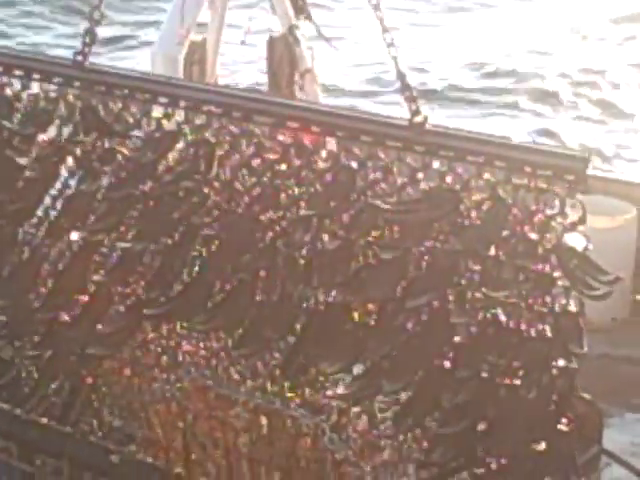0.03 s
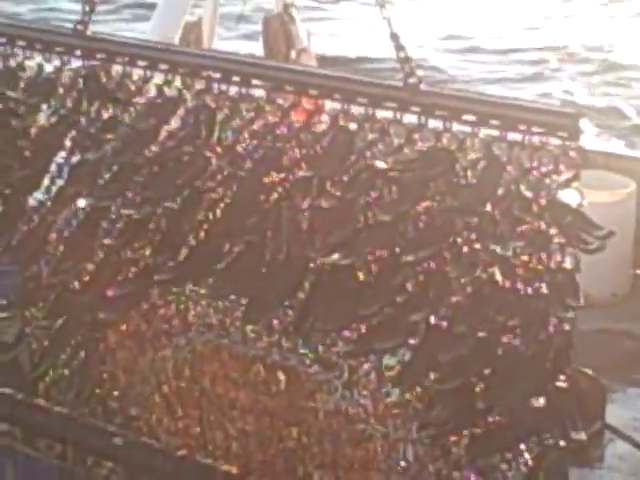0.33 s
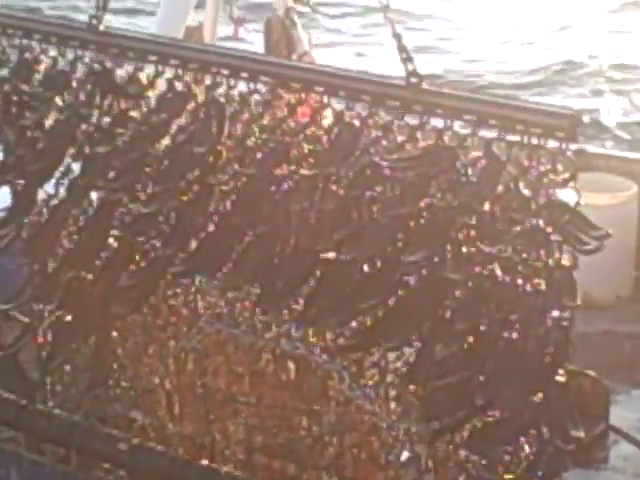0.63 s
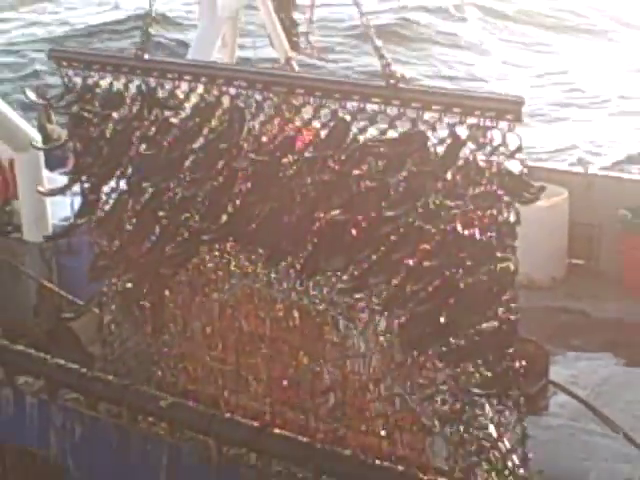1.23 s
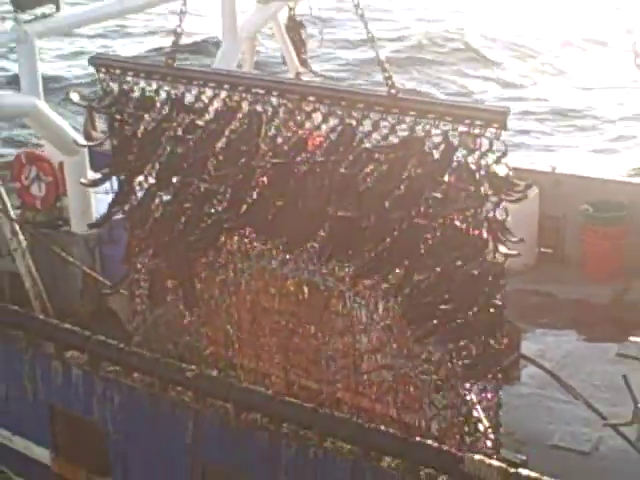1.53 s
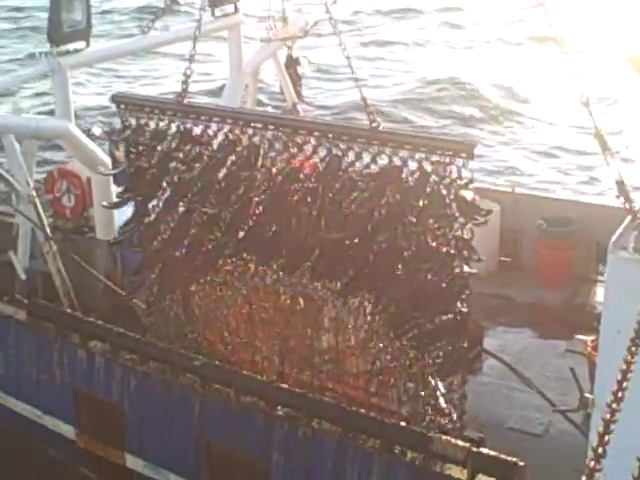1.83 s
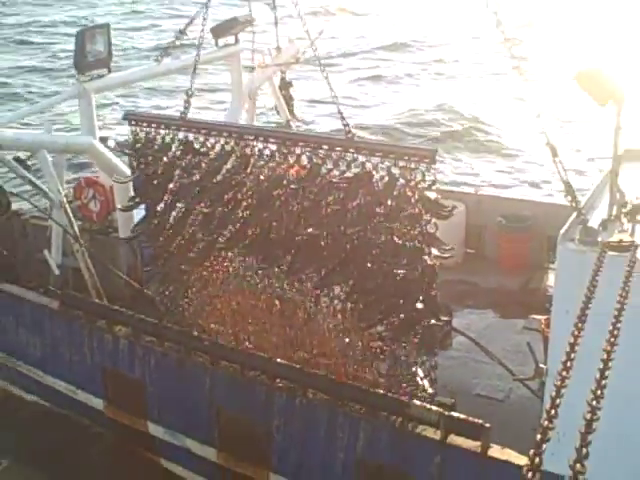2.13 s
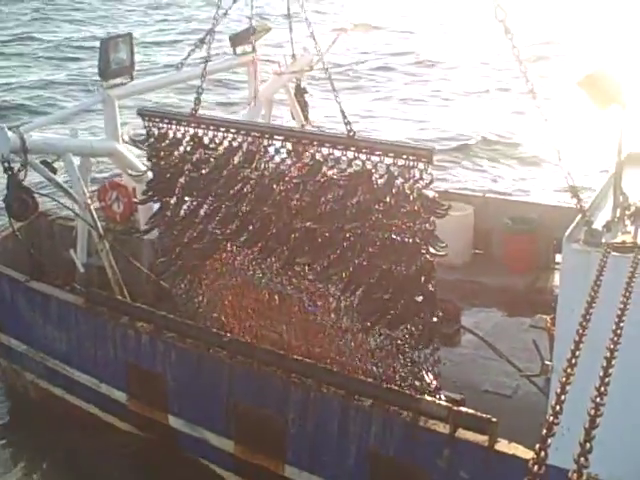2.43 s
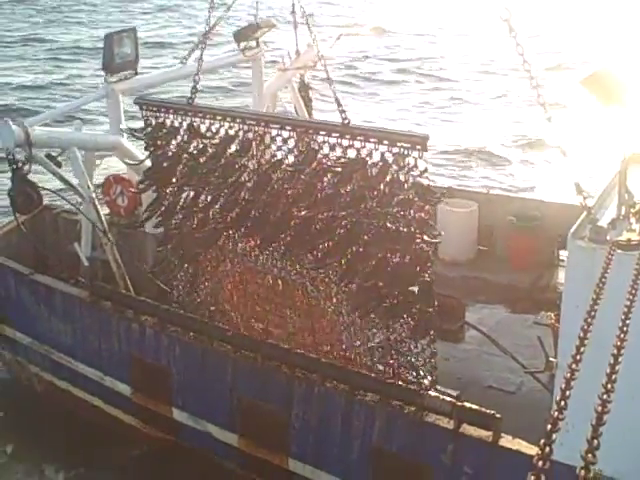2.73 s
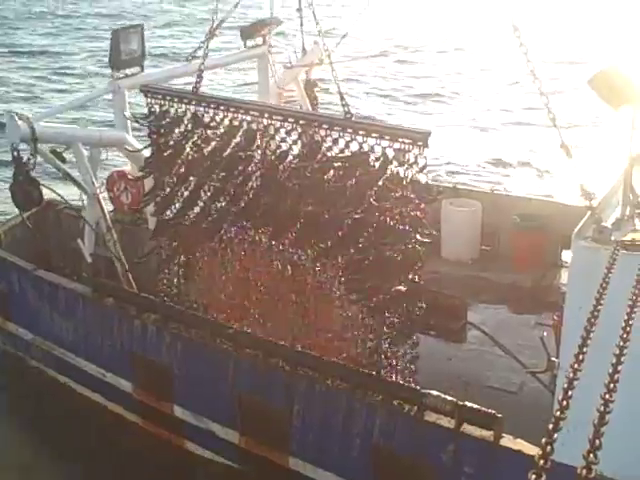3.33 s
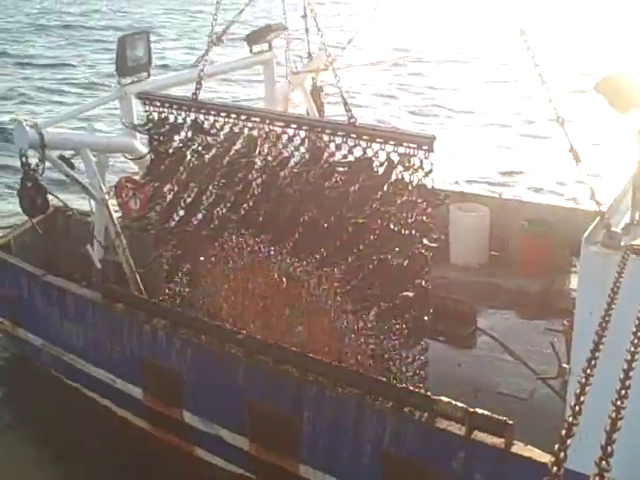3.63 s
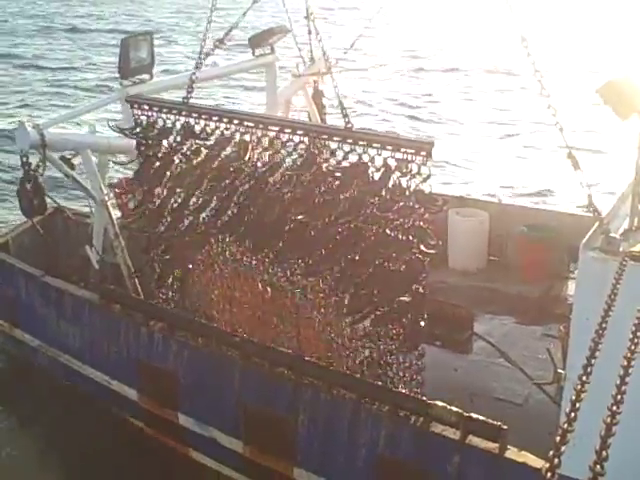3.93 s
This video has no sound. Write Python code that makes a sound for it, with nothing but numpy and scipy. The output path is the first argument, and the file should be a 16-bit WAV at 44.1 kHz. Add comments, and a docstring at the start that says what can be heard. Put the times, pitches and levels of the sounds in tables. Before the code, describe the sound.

A fishing boat's diesel engine throbs and ticks as wind rumbles on the microphone on deck. A winch whines and fades, water gushes, then a steel dredge scrapes, squeaks and clinks as the winch returns amid hard gusts.

```python
"""On the deck of a fishing boat at sea, microphone in the wind, close to a steel-ring dredge over the side.
From the start a four-cylinder diesel throbs and ticks, wind rumbles, and a winch whines, then fades.
After a second the steel groans and water gushes off the dredge; from 1.75 s it scrapes and squeals,
and soon its rings clink. Near 2.3 s the winch returns and the hardest buffets overload the microphone.
The scraping ends around 3.5 s, leaving engine, sea and one more gust."""
import sys
import numpy as np
from scipy import signal
from scipy.fft import rfft, irfft
from scipy.io import wavfile
from scipy.ndimage import uniform_filter1d

SR = 44100
rng = np.random.default_rng(int(sys.argv[2]) if len(sys.argv) > 2 else 0)


def transcribe(signal):
    """Save signal, clipped to [-1, 1], as a 16-bit WAV file at the path in sys.argv[1]."""
    frames = np.atleast_2d(signal).T
    limited = np.clip(frames, -1, 1)
    pcm = np.round(limited * 32767).astype(np.int16)
    wavfile.write(sys.argv[1], SR, pcm)


N = 176400
T = np.arange(N) / SR

CYCLE_HZ = 15.12
# exhaust tones: multiple of the engine cycle, relative level/dB
EXHAUST_TONES = [(1, -34), (2, -43), (4, -39), (6, -39), (8, -35), (12, -38.5), (16, -42)]
def exhaust(waver=0.14, gain_db=-3.5):
    """The diesel's exhaust throbs in wavering harmonics of the engine cycle."""
    out = np.zeros(N)
    for multiple, db in EXHAUST_TONES:
        swell = 1 + waver * drift(hz=7.3)
        phase = 2 * np.pi * (multiple * CYCLE_HZ * T + rng.random())
        out += amp(db) * swell * np.sin(phase + waver * drift(hz=1))
    return amp(gain_db) * out


# cylinders in firing order: relative level/dB
CYLINDER_KNOCKS = [-10.5, -5, -3, -15.5]
# knock spectrum: f/Hz, relative level/dB
KNOCK_SPECTRUM = [(300, 13), (1000, -4), (1300, 13.5), (1800, -4), (2300, -27.5), (3100, 4), (3650, -24),
                  (4300, 3), (4900, 1), (5500, -10), (9000, -28), (16000, -38)]
# engine casing modes: f/Hz, width/Hz, relative level/dB
CASING_RESONANCES = [(2033, 68, 1.5), (3400, 310, -7)]
# knock level, ducking briefly after strong gusts: t/s, relative level/dB
KNOCK_GAIN = [(0, -2.5), (.5, 3), (.73, 0), (.9, 4.5), (1.6, 5.5), (2.2, 3), (2.6, -4.5), (3.2, 1),
              (3.36, -1), (3.55, 0.5), (4, -6)]
def diesel_knock(first_s=0.01225, rise_s=0.0016, fall_s=0.0024):
    """Every firing gives a metallic knock and rings the engine casing."""
    firings = np.zeros(N)
    for k, db in enumerate(CYLINDER_KNOCKS):
        age = (T - first_s - k / len(CYLINDER_KNOCKS) / CYCLE_HZ) % (1 / CYCLE_HZ)
        firings += amp(db) * (1 - np.exp(-age / rise_s)) ** 2 * np.exp(-age / fall_s)
    knock = amp(-52) * colour(firings * noise(), KNOCK_SPECTRUM)
    casing = amp(-58) * unit(resonate(firings * noise(), CASING_RESONANCES))
    return level(KNOCK_GAIN) * (knock + casing)


# winch pitch, sagging under load: t/s, f/Hz
WINCH_PITCH = [(0, 498), (2.35, 498), (2.48, 472), (2.68, 474), (2.78, 494), (4, 485)]
# winch whine at the microphone: t/s, level/dB
WINCH_LEVEL = [(0, -36), (.3, -35.5), (.44, -38.5), (.55, -31.5), (.62, -47), (.75, -47), (1.5, -82),
               (2, -73), (2.3, -34.5), (2.5, -40.5), (2.7, -35.5), (3.1, -50), (4, -43.5)]
def winch(wander_hz=1.5, waver_rad=0.25, flutter=0.3):
    """The winch's hydraulics whine on one unsteady tone."""
    hz = np.interp(T, *np.transpose(WINCH_PITCH)) + wander_hz * drift(hz=3)
    tone = np.sin(2 * np.pi * np.cumsum(hz) / SR + waver_rad * drift(hz=27))
    return level(WINCH_LEVEL) * unit(tone * (1 + flutter * drift(hz=27)))


# dredge dragging on the steel rail: t/s, length/s, level/dB, ringing share (0-1)
RAIL_SCRAPES = [(1.75, 0.069, -47.5, 0.6), (1.861, 0.037, -38, 0.55), (1.906, 0.042, -37, 0.5),
                (2.006, 0.3, -61, 0.9), (2.79, 0.061, -45.5, 0.54), (2.934, 0.054, -41, 0.73),
                (3.012, 0.061, -37.5, 0.37), (3.12, 0.17, -55, 1), (3.445, 0.043, -46.5, 0.1)]
# dredge frame modes: f/Hz, width/Hz, relative level/dB
FRAME_RESONANCES = [(1370, 45, 0), (2085, 45, 0), (2145, 40, -4), (2398, 35, -3), (2640, 60, -5),
                    (2830, 70, -6), (3295, 45, -2), (4420, 60, -15), (5620, 40, -14), (8430, 70, -22),
                    (9350, 70, -23)]
# grating spectrum: f/Hz, relative level/dB
GRIT_SPECTRUM = [(500, -2.5), (900, 1), (1400, 2), (1750, -4), (2200, 5.5), (2900, 5.5), (3450, 2),
                 (3750, -3), (4500, 1.5), (6500, -28), (9000, -39), (16000, -30)]
def dredge_scrapes():
    """Small contacts grate and set the steel frame squealing; each mode grabs and lets go."""
    contacts = grains(per_s=2300, spread_db=1)
    ringing, grating = np.zeros(N), np.zeros(N)
    for start, length, db, share in RAIL_SCRAPES:
        force = amp(db) * envelope(start, length, rise_s=0.0013, fall_s=0.039)
        ringing += force * np.sqrt(share)
        grating += force * np.sqrt(1 - share)
    squeal = resonate(contacts * ringing, FRAME_RESONANCES)
    squeal = np.std(squeal) * patches(squeal, db=3, hz=390, seconds=0.056)
    return squeal + grating * colour(contacts, GRIT_SPECTRUM)


# groans and squeaks: t/s, length/s, f/Hz, level/dB
STICK_SLIPS = [(1.084, 0.06, 342, -38.5), (1.294, .14, 272, -34), (1.859, 0.004, 2480, -32),
               (1.868, .035, 3440, -43.5), (1.923, 0.036, 3300, -40), (2.764, .015, 2080, -47),
               (2.793, 0.03, 3310, -48), (2.802, 0.026, 2093, -44.5), (2.806, 0.043, 5650, -56.5),
               (2.83, 0.036, 8420, -61), (2.848, 0.024, 2130, -44), (2.902, 0.037, 2070, -42),
               (2.92, 0.038, 5610, -54), (2.942, 0.025, 1385, -40), (2.949, 0.03, 3300, -48),
               (3.258, .018, 4250, -51)]
def frame_squeaks(jitter_hz=21.2, roughness=0.31):
    """Where steel sticks and slips, one mode of the frame sings briefly."""
    waver = np.cumsum(jitter_hz * drift(hz=120.6)) / SR
    grip = unit(1 + roughness * drift(hz=90))
    out = np.zeros(N)
    for start, length, hz, db in STICK_SLIPS:
        slip = amp(db) * envelope(start, length, rise_s=0.0032, fall_s=0.0058)
        out += slip * np.sin(2 * np.pi * (hz * T + waver))
    return np.sqrt(2) * grip * out


# rings striking: t/s, level/dB, pitch ratio
RING_STRIKES = [(2.085, -48, 1.05), (2.11, -62, 1.3), (2.14, -67, 1.2), (2.235, -52, 1.06),
                (2.445, -41, 0.993), (3.185, -51, 1.03), (3.965, -53, 1.08)]
# modes of one ring: f/Hz, relative level/dB, t60/s
RING_RESONANCES = [(11690, -13, .45), (12080, -9, .35), (12145, -6, .45), (12400, -9, .1), (12725, 0, .22),
                   (13450, -11, .15), (13740, -12, .25)]
def ring_clinks(rise_s=0.007, chatter_s=0.042, chatter_db=-5.5):
    """Small steel rings chatter against each other and ring on."""
    out = np.zeros(N)
    rattles = [drift(hz=290) for _ in RING_RESONANCES]
    for start, db, ratio in RING_STRIKES:
        span = np.arange(round(start * SR), min(round((start + 0.5) * SR), N))
        age = np.arange(len(span)) / SR
        attack = np.minimum(age / rise_s, 1)
        for (hz, mode_db, t60), rattle in zip(RING_RESONANCES, rattles):
            chatter = amp(chatter_db) * rattle[span] * np.exp(-age / chatter_s)
            swing = amp(-60 * age / t60) + chatter
            out[span] += attack * amp(db + mode_db) * swing * np.sin(2 * np.pi * hz * ratio * age)
    return out


# short dry ticks: t/s, level/dB
DRY_TICKS = [(.05, -57), (0.073, -35.5), (1.817, -37), (1.882, -32), (2.349, -31), (2.372, -34),
             (2.393, -40), (2.452, -66), (3.265, -32.5), (3.277, -42), (3.29, -35), (3.452, -39.5),
             (3.481, -50)]
# tick spectrum: f/Hz, relative level/dB
TICK_SPECTRUM = [(500, 6), (2000, 4), (5000, 0), (8000, -7.5), (16000, -19)]
def ticks():
    """Short bursts of noise; those at 2.35-2.39 s are the crackle of wind overloading the microphone."""
    bursts = sum(amp(db) * envelope(start, 0, rise_s=0.00022, fall_s=0.0057) for start, db in DRY_TICKS)
    return bursts * colour(noise(), TICK_SPECTRUM)


# spray spectrum: f/Hz, relative level/dB
SPRAY_SPECTRUM = [(1000, -31), (2500, 13), (3350, 7.5), (3700, -2), (4500, 9), (5600, 4.5), (6700, -1),
                  (7600, 0), (8600, -0.5), (10200, -7), (11800, -4), (12800, -7), (14200, -6), (15400, -4),
                  (16200, -26)]
# spray at the microphone: t/s, relative level/dB
SPRAY_SWELL = [(0, -67), (.08, -57.5), (.2, -63), (.5, -60.5), (.73, -71), (.87, -67.5), (1.1, -64),
               (1.5, -59.5), (1.85, -54.5), (2.1, -57.5), (2.3, -61), (2.8, -63), (2.97, -56), (3.15, -64),
               (3.5, -67), (4, -74)]
def spray(gain_db=8):
    """Drips and sea spray blend into a fine hiss."""
    hiss = patches(noise(), db=3.2, hz=140, seconds=0.03)
    return amp(gain_db) * level(SPRAY_SWELL) * colour(hiss, SPRAY_SPECTRUM)


# gush spectrum: f/Hz, relative level/dB
GUSH_SPECTRUM = [(1000, 5), (3000, 4), (3650, -7), (4500, 9), (5600, 2.5), (6700, -9), (7500, 3), (8600, 0),
                 (10200, -8.5), (11800, 0), (12800, -7), (14200, 3), (15400, 0), (16200, -23)]
def gush(db=-39.5):
    """Water pours off the dredge once, in thousands of sparkling drops."""
    drops = patches(grains(per_s=5700, spread_db=0.5), db=4.5, hz=109, seconds=0.11)
    flow = amp(db) * envelope(start_s=1.2, hold_s=0.21, rise_s=0.18, fall_s=0.14)
    return flow * colour(drops, GUSH_SPECTRUM)


# turbulence right at the microphone: t/s, length/s, flutter level/dB, rasp level/dB
PORT_BUFFETS = [(0.299, 0.019, -54, -23.5), (0.605, 0.025, -29, -37.5), (2.275, 0.047, -22.5, -37.5),
                (2.347, 0.0085, -12, -17.5), (2.363, 0.0376, -15.5, -23.5), (3.811, 0.031, -23.5, -42),
                (3.843, 0.0097, -23, -30)]
# low flutter spectrum: f/Hz, relative level/dB
FLUTTER_SPECTRUM = [(30, -14), (120, 12), (250, -10.5), (480, -3), (700, -30), (1500, -42), (5000, -53)]
# rasp spectrum: f/Hz, relative level/dB
RASP_SPECTRUM = [(200, -18), (420, 3.5), (600, 12), (820, -15), (1150, 6), (1400, -1), (1750, -18),
                 (2100, -10), (2850, -9), (3250, -23), (4300, -22.5), (6000, -35), (16000, -46)]
# cracks and thumps as buffeting breaks loose: t/s, amplitude, f/Hz, decay/s
PORT_CRACKS = [(0.303, 0.16, 1160, 0.0054), (0.3131, 0.096, 1310, 0.0029), (0.614, 0.23, 107, 0.0064),
               (2.3472, 0.82, 935, 0.00052), (2.371, 0.72, 135, 0.0046), (2.388, 0.29, 216, 0.002),
               (2.4, 0.28, 180, .003), (3.8272, 0.29, 230, 0.0012), (3.845, 0.12, 204, 0.011),
               (3.852, 0.056, 1460, .004)]
# single pops of air: t/s, suction amplitude, hold and decay/s
AIR_POPS = [(2.275, 0.44, 0.0056), (2.7463, 2.1, 0.0017), (2.755, 0.4, 0.0038)]
def buffets():
    """The strongest gusts flutter, rasp, crack and pop at the microphone port."""
    flutter = colour(noise(), FLUTTER_SPECTRUM)
    rasp = colour(grains(per_s=5000, spread_db=1), RASP_SPECTRUM)
    out = np.zeros(N)
    for start, length, flutter_db, rasp_db in PORT_BUFFETS:
        burst = envelope(start, length, rise_s=0.002, fall_s=0.005)
        out += burst * (amp(flutter_db) * flutter + amp(rasp_db) * rasp)
    for start, size, hz, decay in PORT_CRACKS:
        out += size * envelope(start, 0, 1 / SR, decay) * np.sin(2 * np.pi * hz * (T - start))
    for start, suction, decay in AIR_POPS:
        out -= suction * envelope(start, decay, rise_s=0.00083, fall_s=decay)
    return out


# rumble spectrum: f/Hz, relative level/dB
RUMBLE_SPECTRUM = [(2, 11.5), (6, 9), (14, 7), (28, -2.5), (55, -6), (100, -11), (180, -21.5), (400, -31.5),
                   (1500, -75.5)]
# rumble on the microphone: t/s, level/dB
RUMBLE_LEVEL = [(0, -33), (.15, -21), (.27, -20), (.4, -17), (.55, -20), (.64, -14), (.73, -17.5),
                (.87, -18), (.96, -16), (1.1, -14), (1.5, -20), (1.95, -20), (2.2, -16.5), (2.3, -20.5),
                (2.42, -16), (2.5, -25.5), (2.8, -22.5), (3, -19.5), (3.22, -16.5), (3.4, -22.5),
                (3.57, -22), (3.8, -15.5), (4, -22.5)]
# gusts: centre t/s, half width/s, suction amplitude (negative pushes)
PASSING_GUSTS = [(0.295, 0.024, 0.52), (0.668, 0.035, 0.5), (.928, 0.036, -0.62), (2.378, 0.058, 0.9),
                 (3.273, 0.059, 1.15), (3.798, 0.079, 0.6)]
def wind(lumpy_db=0.5, recovery_s=0.42):
    """Wind rumbles, and the pressure swings slowly as gusts pass the microphone."""
    suction = sum(depth * np.exp(-((T - centre) / width) ** 2) for centre, width, depth in PASSING_GUSTS)
    recovery = uniform_filter1d(suction, int(recovery_s * SR))
    turbulence = noise() * amp(-lumpy_db * drift(hz=3.1))
    return level(RUMBLE_LEVEL) * colour(turbulence, RUMBLE_SPECTRUM) - suction + recovery


# machinery and sea spectrum: f/Hz, relative level/dB
ROAR_SPECTRUM = [(30, 6), (110, 9.5), (200, 4.5), (340, -2), (400, 0.5), (470, 4), (560, -3.5),
                 (720, -11.5), (950, -14), (1250, -8.5), (1550, -17), (1850, -19), (2100, -23.5),
                 (2450, -23.5), (3350, -26.5), (3650, -30), (4500, -27), (6500, -43.5), (16000, -86)]
# roar level, ducking briefly after strong gusts: t/s, level/dB
ROAR_GAIN = [(0, -29.5), (.3, -27.5), (.64, -31), (.7, -38), (.75, -41.5), (.79, -31), (.9, -33.5),
             (1.4, -32), (1.75, -31), (1.95, -28.5), (2.25, -32.5), (2.55, -33), (2.9, -33), (3.28, -32.5),
             (3.34, -44.5), (3.48, -36), (3.7, -34), (4, -34.5)]
def roar(patchy_db=1.56):
    """Farther off, machinery and sea merge into an uneven roar."""
    wash = noise() * amp(patchy_db * drift(hz=59))
    wash = patches(wash, db=2, hz=78, seconds=0.41)
    return level(ROAR_GAIN) * colour(wash, ROAR_SPECTRUM)


# dips in the microphone's response: f/Hz, width/Hz, level/dB
MIC_NOTCHES = [(1767, 92, -4), (3700, 130, -7), (5260, 116, -10.5), (6610, 130, -5.5)]
def microphone(x):
    """The microphone dulls a few narrow bands."""
    f = np.fft.rfftfreq(N, 1 / SR)
    response_db = sum(db * np.exp(-((f - hz) / width) ** 2) for hz, width, db in MIC_NOTCHES)
    return irfft(rfft(x) * amp(response_db), N)


def amp(db):
    """Decibels to gain."""
    return 10 ** (np.asarray(db) / 20)


def unit(x):
    """Scales to rms 1."""
    return x / np.sqrt(np.mean(x ** 2) + 1e-20)


def level(points):
    """Gain over time from (t/s, level/dB) points."""
    return amp(np.interp(T, *np.transpose(points)))


def colour(x, points):
    """Filters by a (f/Hz, level/dB) curve, then scales to rms 1."""
    hz, db = np.transpose(points)
    f = np.fft.rfftfreq(N, 1 / SR)
    gain = amp(np.interp(np.log(f + 1e-3), np.log(hz), db))
    return unit(irfft(rfft(x) * gain * (f > 0), N))


def noise():
    """White noise."""
    return rng.standard_normal(N)


def drift(hz):
    """Random motion up to about hz, at rms 1."""
    f = np.fft.rfftfreq(N, 1 / SR)
    return unit(irfft(rfft(noise()) * np.exp(-(f / hz) ** 2) * (f > 0), N))


def grains(per_s, spread_db):
    """Random impacts, most small and a few large."""
    impacts = noise() * (rng.random(N) < per_s / SR)
    return unit(impacts * amp(spread_db * np.minimum(rng.exponential(1, N), 4)))


def envelope(start_s, hold_s, rise_s, fall_s):
    """Linear attack; exponential release from hold_s after the start."""
    return np.clip((T - start_s) / rise_s, 0, 1) * np.exp(-np.maximum(T - start_s - hold_s, 0) / fall_s)


def patches(x, db, hz, seconds):
    """Lets bands about hz wide swell and fade independently; returns rms 1."""
    bands = signal.stft(x, nperseg=1024, noverlap=768)[2]
    swell = rng.standard_normal(bands.shape)
    for axis, span in enumerate((hz * 1024 / SR, seconds * SR / 256)):
        pole = np.exp(-2 / span)
        swell = signal.filtfilt([1 - pole], [1, -pole], swell, axis=axis, padtype="even", padlen=40)
    bands *= amp(db * np.clip(unit(swell), -3, 3))
    return unit(signal.istft(bands, nperseg=1024, noverlap=768)[1][:N])


def resonate(x, modes):
    """Passes a signal through decaying modes (f/Hz, width/Hz, level/dB)."""
    t = T[:SR // 4]
    response = sum(amp(db) * np.sqrt(width) * np.exp(-np.pi * width * t) * np.sin(2 * np.pi * hz * t)
                   for hz, width, db in modes)
    return signal.oaconvolve(x, response / np.linalg.norm(response))[:N]


def scene():
    """Everything that reaches one microphone on deck."""
    boat = exhaust() + diesel_knock() + roar() + winch()
    water = spray() + gush()
    frame = dredge_scrapes() + frame_squeaks()
    return (boat + water + frame + ticks() + ring_clinks() + wind() + buffets())[None]


def record(dry):
    """The microphone's input overloads at full scale, then is band-limited to 17 kHz."""
    clipped = np.clip(microphone(dry), -1, 1)
    lowpass = signal.firwin(511, 17000, window=("kaiser", 9), fs=SR)
    return signal.oaconvolve(clipped, lowpass[None], "same")


dry = scene()
out = record(dry)
transcribe(out)
```